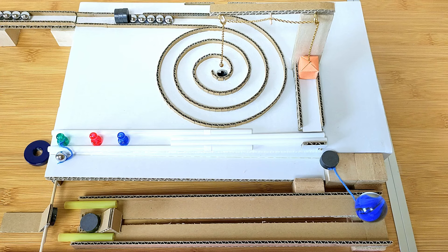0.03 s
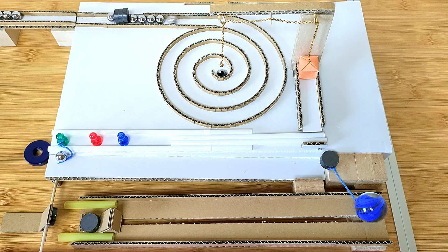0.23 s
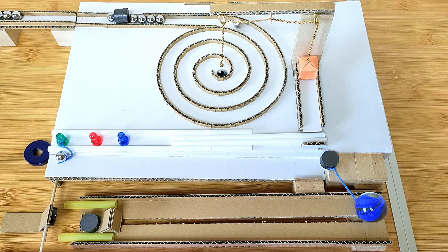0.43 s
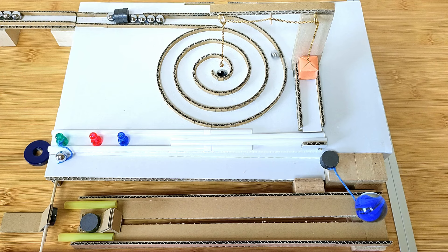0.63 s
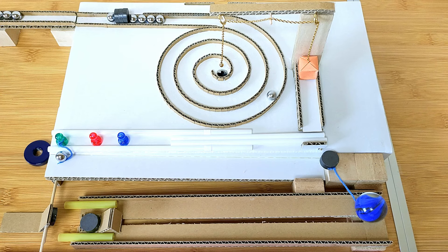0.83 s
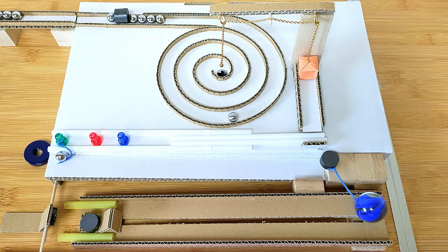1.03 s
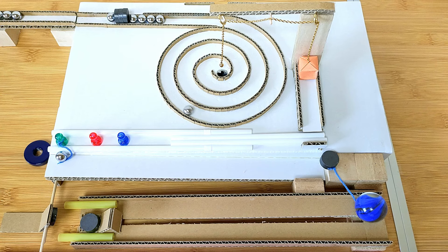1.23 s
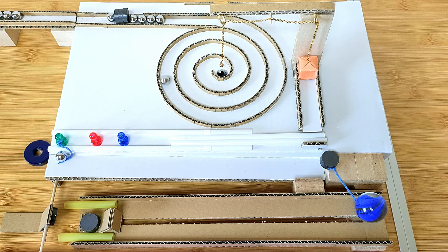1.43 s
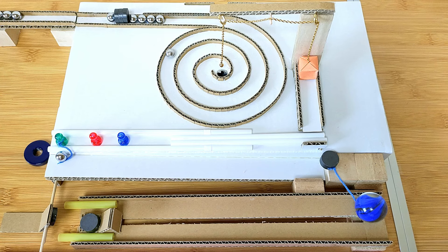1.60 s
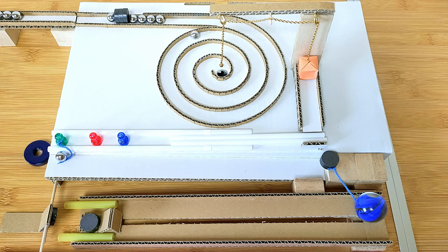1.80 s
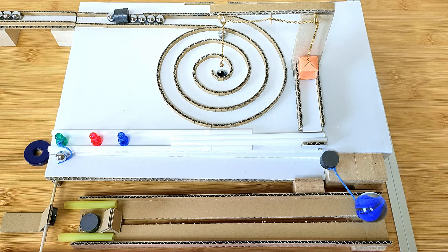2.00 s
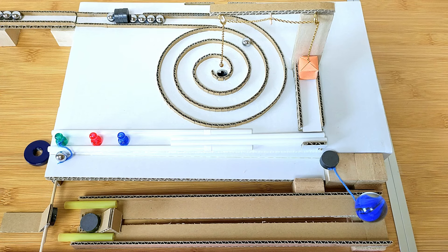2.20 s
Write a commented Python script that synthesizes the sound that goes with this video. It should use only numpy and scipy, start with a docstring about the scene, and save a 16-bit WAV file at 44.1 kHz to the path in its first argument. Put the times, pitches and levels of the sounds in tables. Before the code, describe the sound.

Close up in a small, quiet room, a metal ball snaps onto a magnet and sends another thumping down a chute. It cracks against a cardboard wall and rolls on with a low rumble, grazing the sides as it slows.

```python
"""A small, quiet room, with a stereo microphone close to a ball run. A steel ball snaps onto a magnet,
left of centre, and shoots another ball off the far end of the row. That ball thumps along a cardboard
chute, cracks against the wall of a spiral track and rolls round it, grazing the wall and rumbling in
the hollow board as it slows. The room answers the two sharp hits and, more softly, the rolling."""
import sys
import numpy as np
from scipy import signal
from scipy.fft import rfft, irfft
from scipy.io import wavfile

SR = 44100
rng = np.random.default_rng(int(sys.argv[2]) if len(sys.argv) > 2 else 0)


def dump(signal):
    """Clip the signal to [-1, 1] and save it as 16-bit WAV at the path in sys.argv[1]."""
    limited = np.clip(np.atleast_2d(signal).T, -1, 1)
    pcm = np.round(limited * 32767).astype(np.int16)
    wavfile.write(sys.argv[1], SR, pcm)


N = 103635

# stereo width at the microphone (frequency [Hz], side against mid [dB])
STEREO_WIDTH = [(60, -7), (320, -17.5), (600, -6.5), (1200, -5), (2200, -1.5)]
# murmur of the room's air (frequency [Hz], level [dB])
ROOM_TONE_COLOUR = [(25, -22), (115, -10), (175, 3), (300, -14), (1200, -21), (8000, -44)]
# the room's reverberation (frequency [Hz], time to fall 60 dB [s])
ROOM_DECAY = [(60, 0.16), (400, 0.14), (1500, 0.32), (6500, 0.28), (15000, 0.27)]
# reflections off nearby surfaces (delay [s], level against the direct sound [dB])
REFLECTIONS = [(.0067, -11), (.0150, -14)]
# the board's low drone, its rumble and the grit in its walls (frequency [Hz], level [dB])
DRONE_COLOUR = [(30, -43.5), (105, -26), (150, -8.5), (200, 5.5), (330, 4), (420, -15), (4000, -78.5)]
RUMBLE_COLOUR = [(30, -44), (110, -37.5), (170, -10.5), (320, -4.5), (600, -4.5), (770, -1), (845, -15.5),
                 (900, -3.5), (1200, -17), (2000, -27.5), (6500, -52.5), (8000, -75), (16000, -90)]
GRIT_COLOUR = [(100, -19), (820, -9), (1100, 10.5), (1600, 1), (2200, -8), (3800, -17.5), (4500, -27),
               (6800, -32), (7600, -44.5), (16000, -57.5)]
# modes of the hollow board (frequency [Hz], level [dB], left over right [dB])
BOARD_MODES = [(150.2, -10, 3), (334, -16, 3), (392.3, -21, 3), (459.5, -16.5, 0.5), (515, -17.5, -1.5),
               (578.9, -17, 13), (612.4, -19, 7.5), (891, -17.5, -5), (1000, -17, 0)]
# the board's main resonance follows the ball's place on the spiral (time [s], frequency [Hz])
SPIRAL_RESONANCE = [(.65, 462), (.95, 417), (1.1, 327), (1.42, 330), (1.55, 543), (1.76, 577), (1.95, 413)]
# course of the roll (time [s], drone level [dB], rumble and grit level [dB])
ROLL_LEVELS = [(0.253, -58, -100), (.32, -75, -34.5), (.45, -38, -39), (.53, -47, -42.5), (0.652, -50, -39),
               (0.721, -49.5, -46.5), (0.868, -48, -52.5), (.94, -63, -33.5), (0.989, -52, -42),
               (1.057, -59, -35.5), (1.129, -46, -38), (1.19, -55.5, -49), (1.488, -45.5, -46.5),
               (1.548, -40, -40.5), (1.66, -43, -48.5), (1.729, -41.5, -46.5), (1.9, -47, -52),
               (2.098, -60, -60.5), (2.291, -60.5, -60.5), (2.35, -52, -51)]
# the ball grazes the spiral wall (time [s], fade [s], level [dB], ringing pitch [Hz])
WALL_SCRAPES = [(.564, 0.0078, -58.5, 1126), (0.627, 0.0064, -53.5, 1595), (0.727, 0.013, -51, 5250),
                (0.784, 0.014, -57.5, 2270), (0.914, 0.016, -58, 3630), (0.954, 0.013, -53, 5270),
                (1.025, 0.027, -58, 5070), (1.535, 0.015, -58.5, 2525), (1.704, 0.029, -67.5, 1520),
                (1.788, 0.016, -66.5, 1530), (1.834, 0.11, -70.5, 1840)]
# the ball bumps on the cardboard (time [s], level [dB], contact time [ms])
CARD_BUMPS = [(0.261, -9, 1), (0.305, -10, 0.026), (0.3112, -10.5, 0.19), (0.344, -5.5, 0.62),
              (0.464, -16, 0.067), (0.563, -18, 0.037), (.627, -16, 0.18), (0.79, -23, 0.083),
              (0.922, -19, 0.16), (1.026, -15, 0.13), (1.62, -15, 0.7), (1.706, -9.5, 0.82)]
# the snap on the magnet, then the crack on the spiral wall, as they reach the microphone
# (time [s], direct level [dB], room level [dB], left lead [ms], left over right [dB])
SHARP_HITS = [(.2032, -1, -3.5, .17, 7), (.3683, 4.5, -3, -.15, -.5)]
# spectra of those two hits (frequency [Hz], level [dB])
SNAP_SPECTRUM = [(30, -9.5), (180, 4), (450, -13), (1100, -7.5), (2400, -18), (3900, -19), (5200, -5.5),
                 (6400, 1.5), (7400, -5.5), (9000, -15.5), (14500, -24), (16500, -48)]
CRACK_SPECTRUM = [(30, -6.5), (250, -3.5), (600, 7.5), (1050, 0), (1900, 4), (3700, -2), (5600, 1.5),
                  (8200, -5.5), (10500, -16.5), (15000, -31.5), (16500, -41.5)]
# ring of the steel row and magnet, and of the spiral wall (frequency [Hz], level against the hit [dB])
STEEL_MODES = [(3838, -25.5), (5440, -32), (6640, -28), (8360, -29)]
WALL_MODES = [(778, -21.5), (1456, -28), (1945, -36), (2458, -27), (3005, -22.5), (3895, -27.5)]

ROOM_TONE_DB, ROOM_BUILD_S, ROOM_LOW_HZ = -72.5, .01, 150
BOARD_T60_S, WALL_T60_S, HIT_T60_S = .27, .03, .24
DRONE_DB, RUMBLE_DB, GRIT_DB, TICK_DB, BOARD_RING_DB, ROLL_ROOM_DB = -9, -11.5, -15.5, -17, -11, -7
GRAINS_PER_S, GRIT_FADE_DB_PER_S = 1800, 8.5  # the grit softens as the ball slows
NODES_PER_S = 3.226  # how often the ball crosses a still line of each mode
SPIRAL_WIDTH_HZ, SPIRAL_DB, SCRAPE_RING_DB = 223, 4, 12
REBOUND_S, REBOUND_DB = .00315, -8  # each hit touches twice


def amp(db):
    """Decibels to amplitude."""
    return 10 ** (np.asarray(db) / 20)


def unit_rms(x):
    """Scale to an RMS of 1."""
    return x / np.sqrt(np.mean(x ** 2) + 1e-20)


def value_at(points, hz):
    """Interpolate a table over log frequency."""
    table_hz, value = np.transpose(points)
    return np.interp(np.log(hz + 1), np.log(table_hz + 1), value)


def add(mix, at_s, sound):
    """Mix a sound in from the given time."""
    part = mix[..., max(round(at_s * SR), 0):][..., :sound.shape[-1]]
    part += sound[..., :part.shape[-1]]


def convolve(x, response):
    """Filter each channel, keeping at most N samples."""
    return signal.fftconvolve(np.atleast_2d(x), np.atleast_2d(response), axes=1)[:, :N]


def colour(points, size=4096):
    """Causal impulse response of energy 1 with the given spectrum."""
    log_gain = np.log(amp(value_at(points, abs(np.fft.fftfreq(size, 1 / SR)))))
    minimum_phase = np.exp(np.conj(signal.hilbert(log_gain)))
    response = np.fft.ifft(minimum_phase).real[:size // 2]
    return response / np.linalg.norm(response)


def stereo(pair):
    """Two unrelated signals become left and right: narrow bass, wide treble."""
    size = pair.shape[1]
    width = amp(value_at(STEREO_WIDTH, np.fft.rfftfreq(2 * size, 1 / SR)))
    mid, side = rfft(pair, 2 * size)
    left_right = np.array([mid + width * side, mid - width * side])
    return irfft(left_right / np.sqrt(1 + width ** 2))[:, :size]


def ring(hz, t60, size=16384):
    """One dying mode of energy 1."""
    t = np.arange(size) / SR
    wave = np.cos(2 * np.pi * hz * t) * np.exp(-np.log(1000) * t / t60)
    return wave / np.linalg.norm(wave)


def resonate(x, hz, width_hz):
    """A resonance of gain 1 that follows the curve hz."""
    carrier = np.exp(2j * np.pi * np.cumsum(hz) / SR)
    pole = np.exp(-np.pi * width_hz / SR)
    return 2 * (carrier * signal.lfilter([1 - pole], [1, -pole], x / carrier)).real


def room_tone():
    """The quiet, low murmur of the air around the microphone."""
    air = stereo(rng.standard_normal((2, N)))
    return amp(ROOM_TONE_DB) * unit_rms(convolve(air, colour(ROOM_TONE_COLOUR)))


def room_tail():
    """The small room's diffuse answer, shortest in the bass."""
    t = np.arange(SR * 3 // 4) / SR
    hz, frame_s, noise = signal.stft(rng.standard_normal((2, len(t))), SR, nperseg=256)
    decay = amp(-60 * frame_s / value_at(ROOM_DECAY, hz)[:, None])
    tail = signal.istft(noise * decay, SR)[1][:, :len(t)]
    tail = stereo(tail * (1 - np.exp(-(t / ROOM_BUILD_S) ** 2)))
    tail = signal.sosfilt(signal.butter(2, ROOM_LOW_HZ, "high", fs=SR, output="sos"), tail)
    return tail / np.linalg.norm(tail, axis=1, keepdims=True)


def card_walls(size=4096):
    """Response of the thin card walls: a tick and a short cluster of dense modes."""
    cluster = stereo(rng.standard_normal((2, size))) * amp(-60 * np.arange(size) / SR / WALL_T60_S)
    response = cluster / np.linalg.norm(cluster[0])
    response[:, 0] += 1  # the tick
    return convolve(response, colour(GRIT_COLOUR))


def hollow_board(force, spectrum):
    """The cardboard sounds; its modes swell and fade as the ball crosses their still lines."""
    path = np.pi * NODES_PER_S * np.arange(N) / SR
    body = convolve(force, colour(spectrum))
    out = body.copy()
    for (hz, db, pan_db), phase in zip(BOARD_MODES, rng.uniform(0, 2 * np.pi, len(BOARD_MODES))):
        coupling = .5 + abs(np.cos(path + phase))
        gain = amp(BOARD_RING_DB + db + np.array([[pan_db], [-pan_db]]) / 2)
        out += gain * convolve(body * coupling, ring(hz, BOARD_T60_S))
    return out


def grains(spread_db):
    """The ball crosses the card's fibres: dense tiny knocks, made uneven by spread_db."""
    strength = amp(spread_db * np.minimum(rng.exponential(1, (2, N)), 4))
    sign = rng.choice([-1, 1], (2, N))
    struck = rng.random((2, N)) < GRAINS_PER_S / SR
    return stereo(unit_rms(strength * sign * struck))


def chatter(decay_s, size=1024, passes=8):
    """A brief burst of tiny contacts with an even spectrum."""
    fade = np.exp(-np.arange(size) / SR / decay_s)
    burst = rng.standard_normal((2, size)) * fade
    for _ in range(passes):  # trim the tail, then flatten the spectrum
        spectrum = rfft(burst * np.minimum(10 * fade, 1))
        burst = irfft(spectrum / (abs(spectrum) + 1e-12))
    return stereo(burst)


def scrape(fade_s, db, hz, size=SR // 2):
    """The ball grazes the wall: a sudden, fading burst of grains that rings at one pitch."""
    fade = np.exp(-np.arange(size) / SR / fade_s)
    burst = grains(spread_db=9)[:, :size] * amp(db) * fade
    return burst + amp(SCRAPE_RING_DB) * resonate(burst, np.full(size, hz), width_hz=130)


def bump(db, contact_ms):
    """A knock spreads through the card; a longer contact is duller."""
    progress = np.arange(SR // 100) / SR * 1000 / contact_ms
    force = progress * np.exp(-2 * progress)
    return amp(db) * convolve(chatter(decay_s=.005), force / force.sum())


def rolling_ball():
    """Fine grain, scrapes and bumps drive the board and its walls, with the room behind them."""
    t = np.arange(N) / SR
    times, drone_db, rumble_db = np.transpose(ROLL_LEVELS)

    def tread(level_db, spread_db=0):
        """Grains that follow a level curve once the ball is rolling."""
        return grains(spread_db) * amp(np.interp(t, times, level_db)) * (t > times[0])

    drone = tread(DRONE_DB + drone_db)
    rumble = tread(RUMBLE_DB + rumble_db)
    spiral_hz = np.interp(t, *np.transpose(SPIRAL_RESONANCE))
    band = resonate(rumble, spiral_hz, SPIRAL_WIDTH_HZ)
    rumble += amp(SPIRAL_DB) * resonate(band, spiral_hz, SPIRAL_WIDTH_HZ)
    grit = tread(GRIT_DB + rumble_db - GRIT_FADE_DB_PER_S * times, spread_db=7)
    for at_s, fade_s, db, hz in WALL_SCRAPES:
        add(grit, at_s, scrape(fade_s, db, hz))
    for at_s, db, contact_ms in CARD_BUMPS:
        knock = bump(db, contact_ms)
        add(rumble, at_s, knock)
        add(grit, at_s, amp(TICK_DB) * knock)
    direct = hollow_board(drone, DRONE_COLOUR) + hollow_board(rumble, RUMBLE_COLOUR)
    direct += convolve(grit, card_walls())
    return direct + amp(ROLL_ROOM_DB) * convolve(direct.mean(0), room_tail())


def sharp_hit(hit, spectrum, modes, chatter_s):
    """A hard contact reaches the microphone with its reflections, room tail, rebound and ring."""
    at_s, direct_db, room_db, lead_ms, pan_db = hit
    out = np.zeros((2, N))
    direct = chatter(chatter_s) * amp(direct_db)
    for channel, sign in enumerate((1, -1)):
        add(out[channel], at_s - sign * lead_ms / 2000, direct[channel] * amp(sign * pan_db / 2))
    for delay_s, db in REFLECTIONS:
        add(out, at_s + delay_s, chatter(chatter_s) * amp(direct_db + db))
    add(out, at_s, room_tail() * amp(room_db))
    add(out, REBOUND_S, amp(REBOUND_DB) * out)
    for hz, db in modes:
        add(out, at_s, ring(hz, HIT_T60_S) * amp(direct_db + db))
    return convolve(out, colour(spectrum))


def scene():
    """The two hits and the rolling ball in front, the room tone behind."""
    magnet_snap = sharp_hit(SHARP_HITS[0], SNAP_SPECTRUM, STEEL_MODES, chatter_s=.0008)
    wall_crack = sharp_hit(SHARP_HITS[1], CRACK_SPECTRUM, WALL_MODES, chatter_s=.0011)
    return magnet_snap + wall_crack + rolling_ball() + room_tone()


def record(dry, edge_hz=16300):
    """The recorder's band limit."""
    lowpass = signal.firwin(511, edge_hz, window=("kaiser", 9), fs=SR)
    return signal.oaconvolve(dry, lowpass[None], "same")


dry = scene()
out = record(dry)
dump(out)
```